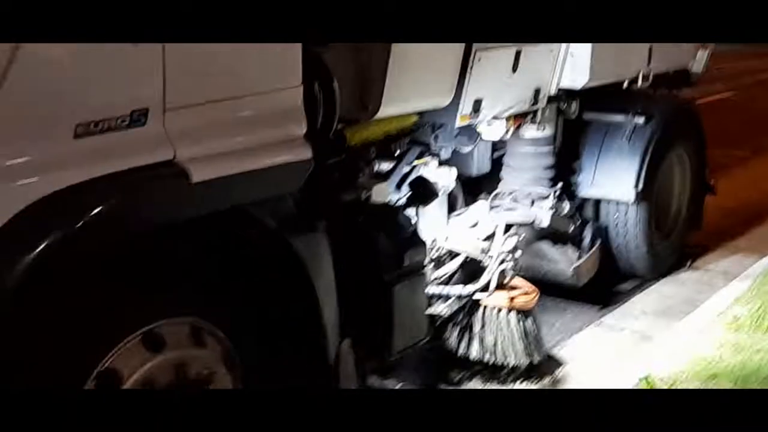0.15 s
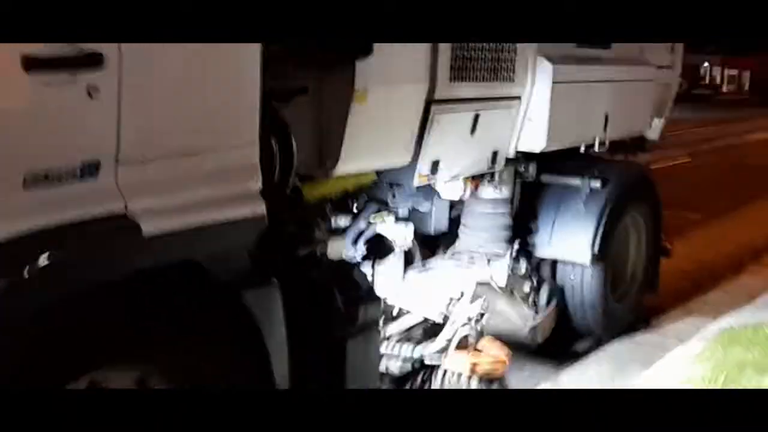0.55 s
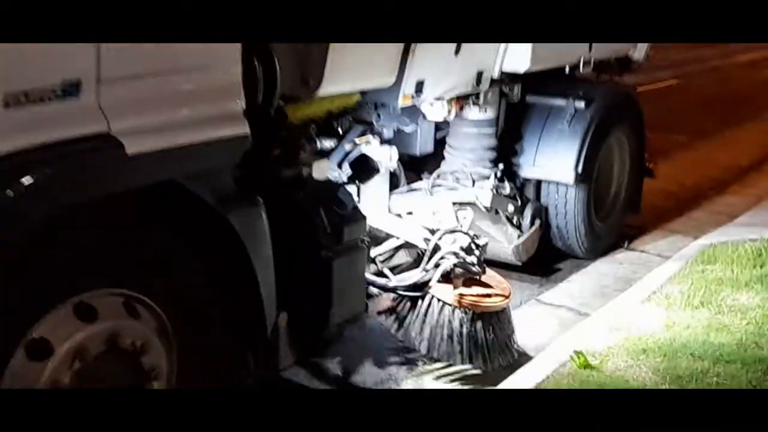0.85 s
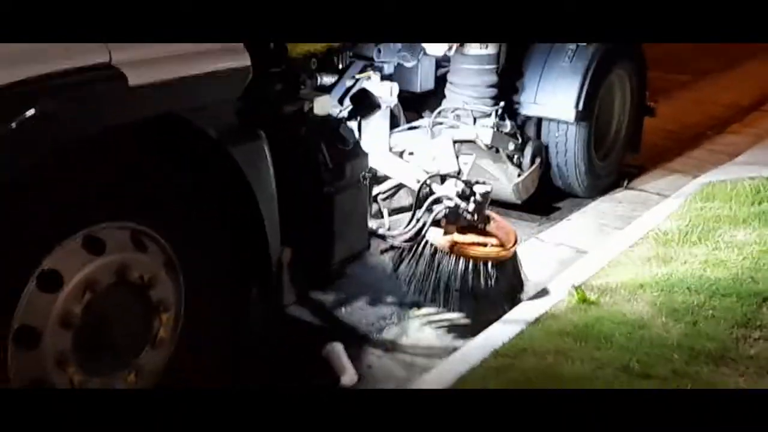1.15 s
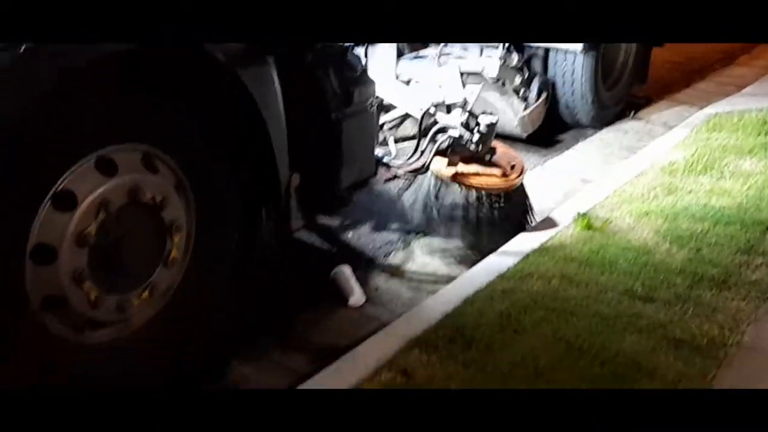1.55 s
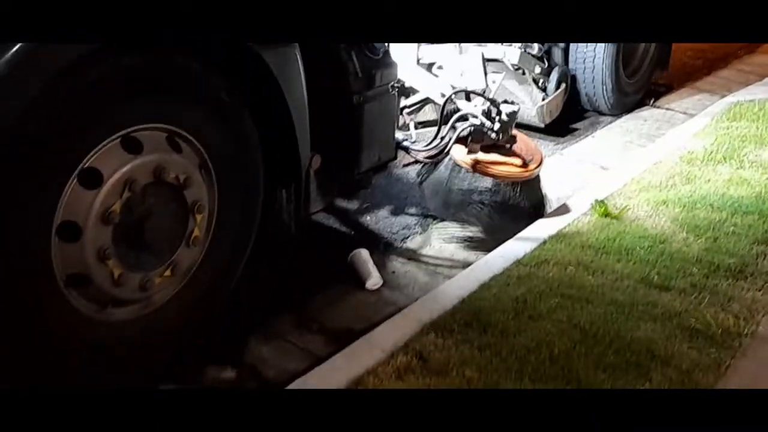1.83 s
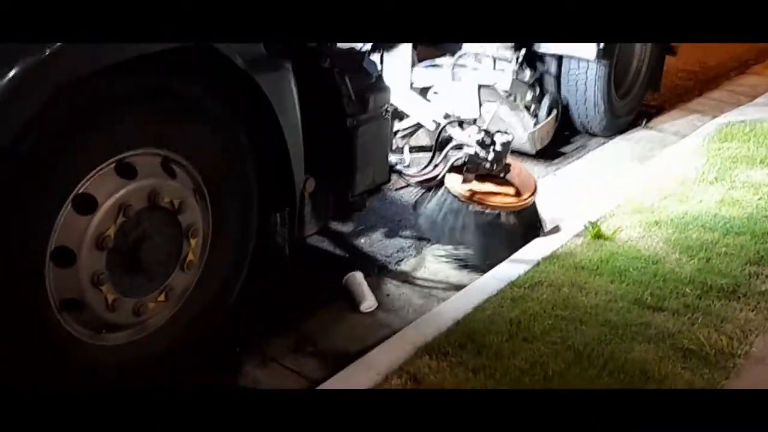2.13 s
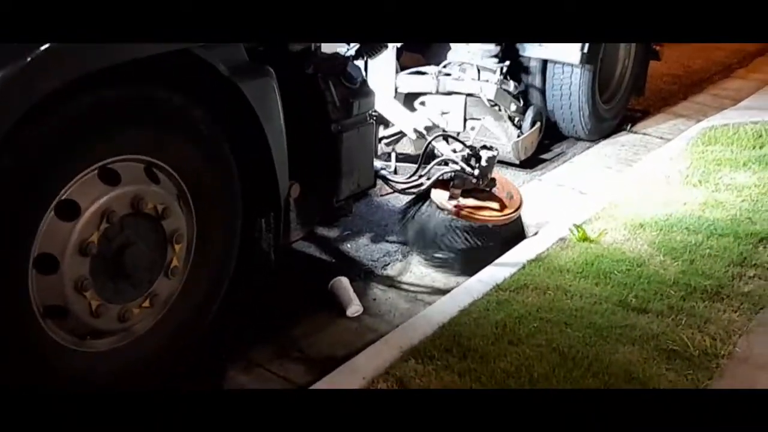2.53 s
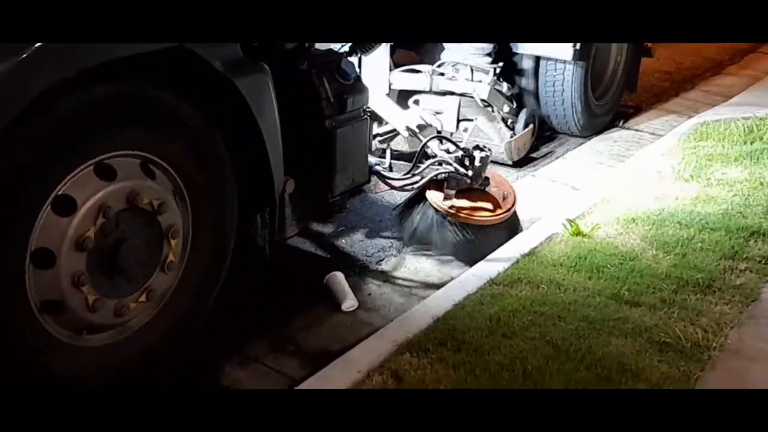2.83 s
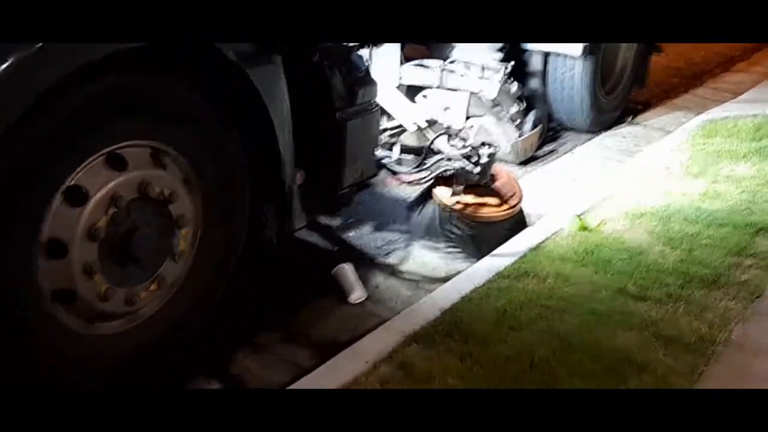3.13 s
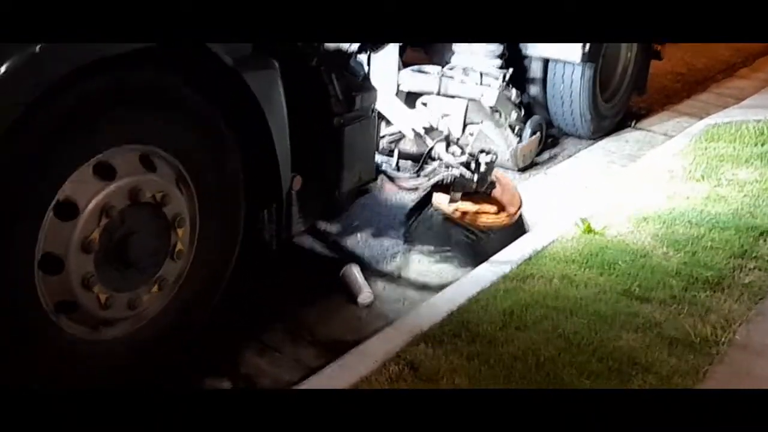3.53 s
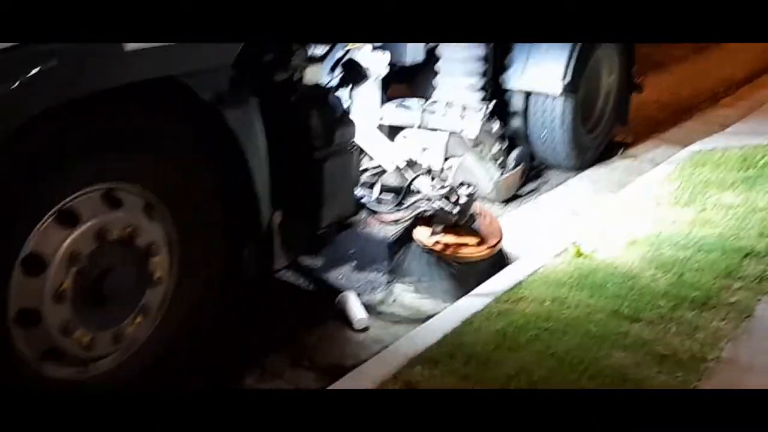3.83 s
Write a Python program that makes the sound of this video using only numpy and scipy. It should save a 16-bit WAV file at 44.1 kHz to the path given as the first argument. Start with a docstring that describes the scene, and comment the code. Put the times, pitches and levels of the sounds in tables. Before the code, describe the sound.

Loud low roar of a sweeper truck idling by a kerb, late turning hummy and hissy.

```python
"""The suction fan of a street sweeper truck roars through its hose: coloured noise and ringing resonances.
Wandering tones hum in the hose and a pipe, whistle in the turbine and squeal from a bristle.
Two engines, sums of shaft orders at slightly unequal speeds, beat slowly; their housings clatter.
Water jets, an air leak and a brush hiss along the kerb, heard at two ports, the right one facing away.
Late on, the airflow tightens: the roar thins, the hose hums on nearly one pitch and the hiss swells."""
import sys
import numpy as np
from scipy import signal
from scipy.fft import rfft, irfft, next_fast_len
from scipy.io import wavfile
from scipy.ndimage import uniform_filter1d, map_coordinates

SR = 44100
rng = np.random.default_rng(int(sys.argv[2]) if len(sys.argv) > 2 else 0)


def how_loud(loudness_db):
    """Turn decibels into a plain amplitude multiplier (0 dB gives 1, 20 dB gives 10)."""
    steps = np.asarray(loudness_db, float) / 20
    return 10 ** steps


def waveform_to_disk(signal):
    """Save audio, clipped to [-1, 1], as 16-bit WAV at the path in sys.argv[1]."""
    frames = np.transpose(np.atleast_2d(signal))
    scaled = np.clip(frames, -1, 1) * 32767
    samples = np.round(scaled).astype(np.int16)
    wavfile.write(sys.argv[1], SR, samples)


N = 175518
T = np.arange(N) / SR  # time_s
SHAFT_HZ, OTHER_SHAFT_HZ = 28.22, 27.485  # the two engines

# Fan roar with open and tight airflow: time_s, open_level_db, tight_level_db
ROAR_LEVELS = [(.1, -20.5, -48), (.6, -19.5, -48), (1.1, -19.5, -48), (1.45, -19, -51), (1.8, -18, -56),
               (2.2, -18.5, -43), (2.5, -19, -43), (2.8, -19.5, -28), (3.05, -20.5, -23),
               (3.3, -27.5, -20.5), (3.6, -28, -18), (3.98, -56, -21)]
# Spectrum of the open roar: frequency_hz, relative_db_per_hz
OPEN_COLOUR = [(21, -45), (35, -27), (60, -11.5), (106, -13.5), (155, -9.5), (197, -12), (240, -3),
               (288, -2.5), (400, -7.5), (470, -11), (547, -15.5), (700, -13), (891, -14.5), (1020, -18),
               (1140, -19), (1270, -16.5), (1550, -18.5), (1890, -21), (2150, -29.5), (2520, -35.5),
               (2750, -37.5), (3300, -37), (4300, -38), (7000, -50.5), (9100, -74), (15400, -120)]
# Spectrum of the tight roar: frequency_hz, relative_db_per_hz
TIGHT_COLOUR = [(21, -42), (35, -24), (65, -12), (103, -17), (171, -17), (208, -23), (250, -9.5),
                (294, -4.5), (330, -11), (400, -18.5), (513, -25.5), (600, -27), (697, -25), (820, -16.5),
                (900, -25), (1000, -26.5), (1310, -22), (1600, -22.5), (2000, -27.5), (2600, -32.5),
                (3380, -71), (5720, -120)]
# Resonances of the hose: centre_hz, width_hz, gain_db
HOSE_MODES = [(252, 30, -6), (278, 36, 0), (310, 30, -2), (340, 22, -3), (380, 22, 1), (438, 30, -7),
              (505, 30, -9)]
# Boom of the hose resonances: time_s, level_db
BOOM_LEVEL = [(.1, -25.5), (.5, -21.5), (1.0, -20.5), (1.4, -18.5), (1.65, -24), (2.0, -21), (2.3, -22.5),
              (2.55, -21.5), (2.75, -21), (3.0, -23), (3.25, -28.5), (3.6, -45)]
# The hose's own note before it steadies: time_s, mean_pitch_hz, level_db
SWIRL_NOTE = [(.1, 276, -25), (.8, 276, -23), (1.4, 286, -21.5), (2.0, 290, -23), (2.6, 288, -23),
              (3.0, 286, -26.5), (3.3, 286, -42), (3.98, 290, -60)]
# The steadied note of the hose: time_s, pitch_hz, level_db
HOSE_HUM = [(2.6, 281, -40), (2.92, 283, -26), (3.1, 284.5, -22), (3.27, 286, -19.5), (3.4, 288, -20),
            (3.5, 289, -17), (3.7, 290.5, -17), (3.77, 291, -14.5), (3.93, 292.5, -14.5), (3.98, 293, -17)]
# Note of a shorter pipe: time_s, pitch_hz, level_db
PIPE_NOTE = [(3.28, 830, -55), (3.37, 832, -34), (3.45, 830, -37), (3.56, 826, -33), (3.68, 815, -36),
             (3.78, 822, -32), (3.98, 815, -35)]
# Turbine whistle: time_s, pitch_hz, level_db
TURBINE_WHISTLE = [(.1, 14640, -55), (.5, 14860, -57), (.9, 15010, -58), (1.2, 15030, -58),
                   (1.6, 15250, -57), (2.2, 15300, -57), (2.6, 15380, -56), (3.2, 15560, -53),
                   (3.98, 15620, -54)]
# Squeal of a bristle: time_s, pitch_hz, level_db
BRISTLE_SQUEAL = [(3.03, 12450, -70), (3.05, 12350, -44), (3.11, 11900, -43), (3.125, 11750, -55),
                  (3.14, 11600, -44), (3.17, 11470, -45), (3.2, 11400, -75)]
# Tones of the first engine: multiple_of_shaft_speed, level_db
FIRST_ORDERS = [(2, -26.5), (3, -50.5), (4, -36), (5, -48.5), (6, -32), (9, -35.5), (11, -31.5)]
# Tones of the second engine: multiple_of_shaft_speed, level_db
SECOND_ORDERS = [(1, -62), (2, -36), (3, -38.5), (4, -60)]
# Resonances of the engine housings: centre_hz, width_hz, gain_db
HOUSING_MODES = [(565, 36, -4), (650, 28, 2), (712, 30, -3), (782, 28, 3), (830, 30, -2), (880, 40, 1),
                 (960, 60, -3), (1150, 120, -6), (1530, 90, -5)]
# Clatter of the housings: time_s, level_db
CLATTER_LEVEL = [(.1, -27.5), (.6, -26), (1.2, -26), (1.8, -27.5), (2.4, -27.5), (3.0, -38), (3.4, -43),
                 (3.98, -34)]
# Spectrum of a rasp around 2-3 kHz: frequency_hz, relative_db_per_hz
RASP_SPECTRUM = [(1200, -40), (1800, -6), (2200, 2), (2700, -6), (3200, -14.5), (4500, -29), (8000, -120)]
# The rasp, fading as the cab moves on: time_s, level_db
RASP_LEVEL = [(.1, -41), (.7, -38), (1.4, -40.5), (2.0, -55), (2.6, -58), (3.98, -58)]
# Water jets: time_s, level_db
JET_LEVEL = [(.1, -60), (1.0, -52), (1.7, -49), (2.2, -48.5), (2.5, -42), (2.7, -35), (2.9, -33),
             (3.1, -32.5), (3.3, -30.5), (3.64, -30.5), (3.81, -32), (3.98, -30)]
# Spectrum of the jets: frequency_hz, relative_db_per_hz
JET_SPECTRUM = [(2350, -31), (4000, -2), (4510, 0), (5420, -9), (6510, -6), (7340, -6), (8370, -11.5),
                (10800, -9.5), (12400, -3), (13900, -2.5), (15700, -9)]
# Spectrum of a steady air leak: frequency_hz, relative_db_per_hz
LEAK_SPECTRUM = [(2940, -32), (5000, -8), (5430, -6), (6310, -5.5), (8270, -8.5), (9660, -10), (13000, -3),
                 (14200, -10), (15100, -2), (15900, -17)]
# Scraping brush: time_s, level_db
BRUSH_LEVEL = [(.1, -44.5), (1.0, -42), (1.8, -44), (2.44, -44.5), (2.75, -48), (3.05, -36.5),
               (3.26, -34.5), (3.45, -31), (3.64, -31.5), (3.98, -33.5)]
# Spectrum of the brush: frequency_hz, relative_db_per_hz
BRUSH_SPECTRUM = [(1180, -21), (2000, -25.5), (2300, -5), (2650, -0.5), (3350, 4), (3720, -1), (4510, -3),
                  (5410, -7.5), (6350, -6.5), (7500, -14), (9750, -20), (16500, -120)]
# Grit flicked by the brush: time_s, peak_level_db (before the high-pass)
GRIT_TICKS = [(.96, -42)]
# Level at the left port over the right: frequency_hz, difference_db
PORT_DIFFERENCE = [(60, -5), (80, 5), (110, -6.5), (140, -1), (190, -0.5), (260, -3.5), (340, -6),
                   (460, -2.5), (610, 8.5), (820, 3), (1100, 6.5), (1470, 9.5), (1960, 4.5), (2620, 3.5),
                   (3510, 12), (4690, 16), (6270, 44), (8390, 38), (11200, 20), (15000, 23)]
# Likeness of the ports: frequency_hz, coherence (0 to 1)
PORT_LIKENESS = [(60, .99), (100, .96), (260, .97), (390, .95), (450, .86), (540, .55), (620, .8),
                 (1050, .74), (1400, .48), (1650, .57), (2200, .17), (3500, .2), (5500, .05), (8000, .02)]
# Phase by which the left port leads: frequency_hz, lead_rad
PORT_LEAD = [(30, .1), (190, .3), (280, .15), (400, .9), (800, 1), (1100, 1.8), (1250, 1.8), (1450, .7),
             (1950, 1.9), (2700, -.4), (4500, 1.5)]


def unit(x):
    """Normalisation: scale to rms 1."""
    return x / np.sqrt(np.mean(x ** 2) + 1e-20)


def along(points, hz):
    """Interpolation of (frequency, value) points on a logarithmic axis."""
    f, v = np.transpose(points)
    return np.interp(np.log(hz + 1), np.log(f + 1), v)


def curves(rows):
    """Linear interpolation in time: one curve for each column after time_s."""
    s, *columns = np.transpose(rows)
    return [np.interp(T, s, column) for column in columns]


def wobble(rate):
    """Slow random fluctuation: a spline through rate random knots a second."""
    return map_coordinates(rng.standard_normal(int(N * rate / SR) + 4), [T * rate])


def filtered(x, response):
    """Linear filtering: the spectrum times a complex response of frequency."""
    m = next_fast_len(N + 8192)
    spectrum = rfft(x, m) * response(np.fft.rfftfreq(m, 1 / SR))
    return irfft(spectrum, m)[..., :N]


def coloured(points):
    """Spectral shaping: a zero-phase gain through (frequency_hz, db) points."""
    return lambda f: how_loud(along(points, f))


def ringing(modes):
    """Modal resonance: each mode is a squared band-pass, with alternating signs."""
    def response(f):
        total = 0
        for k, (centre, width, db) in enumerate(modes):
            mode = 1j * f * width / (centre * centre - f * f + 1j * f * width)
            total = total + (-1) ** k * how_loud(db) * mode ** 2
        return total
    return response


def rush(gain, patchy_db, grit_db=0):
    """Turbulence: two unrelated noises of one colour, sharing random patches and fine grit in level."""
    white = rng.standard_normal((2, N)) * how_loud(grit_db * wobble(700))
    z = signal.stft(white, nperseg=512)[2]
    field = rng.standard_normal(z.shape[1:])
    field = uniform_filter1d(field, size=6, axis=0)  # smooth over frequency bins
    field = uniform_filter1d(field, size=12, axis=1)  # smooth over time frames
    pair = signal.istft(z * how_loud(patchy_db * unit(field)), nperseg=512)[1][:, :N]
    return unit(filtered(pair, gain))


def tone(hz, db, drift_hz, rate, shake_db):
    """Frequency modulation: summed pitch gives the phase; pitch and level wander."""
    turns = np.cumsum(hz + drift_hz * wobble(rate)) / SR
    return np.sqrt(2) * how_loud(db + shake_db * wobble(rate)) * np.sin(2 * np.pi * turns)


def fan():
    """Flow noise: the broad turbulence of open and of tight airflow, surging together."""
    open_db, tight_db = curves(ROAR_LEVELS)
    wide = how_loud(open_db) * rush(coloured(OPEN_COLOUR), patchy_db=1.0)
    tight = how_loud(tight_db) * rush(coloured(TIGHT_COLOUR), patchy_db=1.0)
    return how_loud(0.43 * wobble(8.83)) * (wide + tight)


def hose_boom():
    """Forced resonance: turbulence rings the modes of the hose."""
    return how_loud(curves(BOOM_LEVEL)[0]) * rush(ringing(HOSE_MODES), patchy_db=1.1)


def hose_note():
    """Pipe tone: the hose's note swoops about, then steadies as a shorter pipe joins."""
    swirl = tone(*curves(SWIRL_NOTE), drift_hz=22, rate=19, shake_db=2.5)
    hum = tone(*curves(HOSE_HUM), drift_hz=1.2, rate=22, shake_db=1.1)
    pipe = tone(*curves(PIPE_NOTE), drift_hz=5, rate=30, shake_db=1.6)
    return swirl + hum + pipe


def turbine():
    """Rotor whistle: a high tone whose pitch and level flicker rapidly."""
    return tone(*curves(TURBINE_WHISTLE), drift_hz=70, rate=200, shake_db=2.5)


def bristle():
    """Friction squeal: a brief tone gliding down in pitch."""
    return tone(*curves(BRISTLE_SQUEAL), drift_hz=40, rate=120, shake_db=2)


def engines():
    """Beating: orders of two shafts at slightly different speeds drift in and out of phase."""
    beat_dip_s = .89  # the two firing tones (order 2) oppose each other then
    t = 2 * np.pi * (T - beat_dip_s)
    first = second = 0
    for k, db in FIRST_ORDERS:
        first = first + how_loud(db + 1.4 * wobble(4.79)) * np.sin(k * SHAFT_HZ * t + (k - 2) ** 2)
    for k, db in SECOND_ORDERS:
        second = second + how_loud(db + .8 * wobble(4.1)) * np.sin(k * OTHER_SHAFT_HZ * t + np.pi)
    return np.sqrt(2) * (first + second)


def clatter():
    """Amplitude modulation: combustion noise in the housings and a rasp pulse at the firing rate."""
    pulse = 1 + 0.12 * np.sin(2 * np.pi * 2 * SHAFT_HZ * T)
    housing = how_loud(curves(CLATTER_LEVEL)[0]) * rush(ringing(HOUSING_MODES), patchy_db=1.5)
    rasp = how_loud(curves(RASP_LEVEL)[0]) * rush(coloured(RASP_SPECTRUM), patchy_db=1.0)
    return pulse * (housing + rasp)


def water_jets():
    """Jet noise: spray turbulence, strongest in the treble."""
    return how_loud(curves(JET_LEVEL)[0]) * rush(coloured(JET_SPECTRUM), patchy_db=1.3)


def air_leak():
    """Jet noise: a steady leak with fine grit in its level."""
    return how_loud(-47.5) * rush(coloured(LEAK_SPECTRUM), patchy_db=.8, grit_db=1.0)


def brush():
    """Friction noise: bristles scrape below the jets in pitch, with coarser grit than the leak."""
    return how_loud(curves(BRUSH_LEVEL)[0]) * rush(coloured(BRUSH_SPECTRUM), patchy_db=1.2, grit_db=1.5)


def grit():
    """Impact noise: a high-passed burst that swells and dies exponentially, 60 dB in 0.088 s."""
    envelope = sum(how_loud(db - 60 * np.abs(T - s) / 0.088) for s, db in GRIT_TICKS)

    def high_pass(f):
        """Fourth-power gain with its corner at 11500 Hz."""
        ratio = (f / 11500) ** 4
        return ratio / (1 + ratio)
    return filtered(envelope * rng.standard_normal((2, N)), high_pass)


def hiss():
    """Superposition: jets, leak and brush flutter with the engine cycle (two turns); grit is added."""
    flutter = 1 + 0.033 * np.sin(2 * np.pi * OTHER_SHAFT_HZ / 2 * T + 1.3)
    return flutter * (water_jets() + air_leak() + brush()) + grit()


def ports(pair):
    """Spatial coherence: two ports alike in the bass, unrelated in the treble, the right one shaded."""
    def mix(hz):
        """Weights of the shared and the unshared noise at each port."""
        alike, lead = np.clip(along(PORT_LIKENESS, hz), 0, 1), along(PORT_LEAD, hz)
        right = how_loud(-along(PORT_DIFFERENCE, hz))  # right gain relative to left
        angle = np.arccos(alike) / 2
        # the shared noise keeps its level in the mean of the ports, before its cosine weight
        scale = 2 / np.sqrt(1 + right * right + 2 * right * alike * np.cos(lead))
        gains = scale * np.array([np.exp(.5j * lead), right * np.exp(-.5j * lead)])
        shared = gains * np.cos(angle)
        unshared = gains * np.sin(angle) * [[1], [-1]]
        return np.array([shared, unshared])
    return filtered(pair[:, None], mix).sum(axis=0)


def scene():
    """Superposition: all sources as heard at the two ports."""
    noises = fan() + hose_boom() + clatter()
    tones = engines() + hose_note() + turbine() + bristle()
    machine = ports(noises + tones * np.array([[1], [0]]))  # tones join the shared noise only
    hiss_right_db = -5.5  # the hiss comes from further left
    return machine + ports(hiss()) * how_loud(np.array([[0], [hiss_right_db]]))


def band_limit(x):
    """A steep low-pass at the top of the band."""
    return signal.sosfilt(signal.butter(12, 16700, fs=SR, output="sos"), x)


def record(dry):
    """Band limitation: a sharp low-pass, then an abrupt switch-on after silence."""
    top_hz, start_s, rise_s = 15750, .1148, .0001
    limited = filtered(dry, lambda hz: hz < top_hz)
    switched = limited * np.clip((T - start_s) / rise_s, 0, 1)
    return band_limit(switched)


dry = scene()
out = record(dry)
waveform_to_disk(out)
```